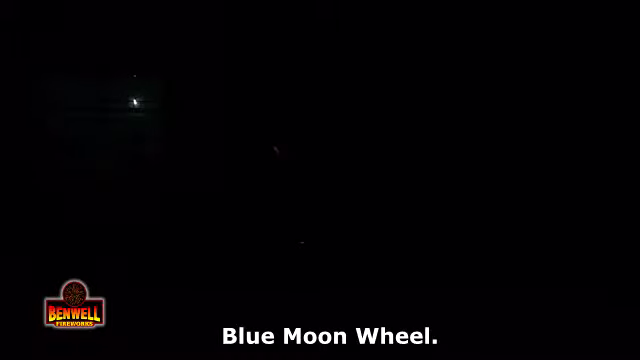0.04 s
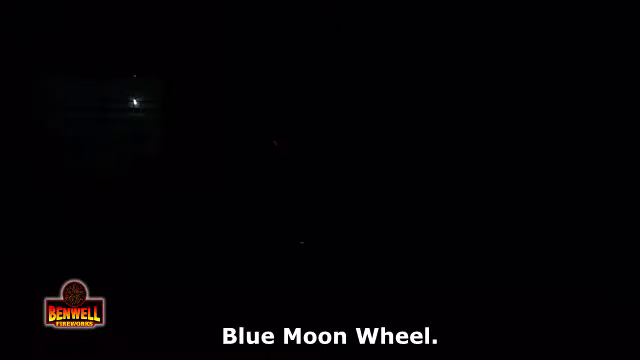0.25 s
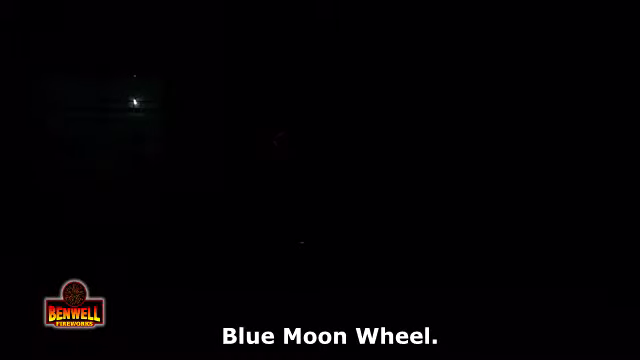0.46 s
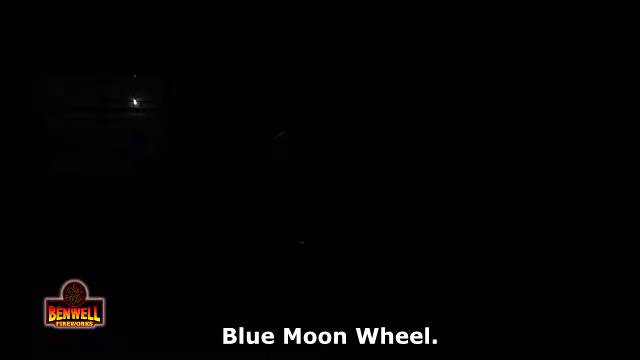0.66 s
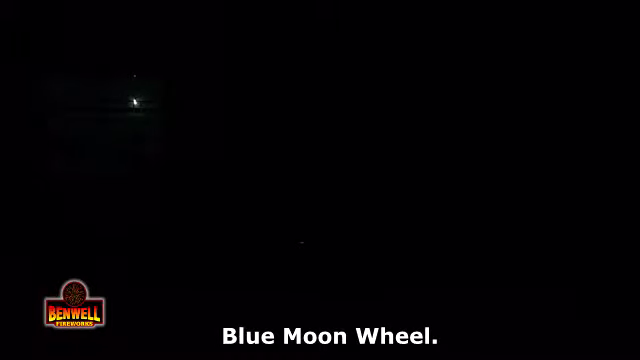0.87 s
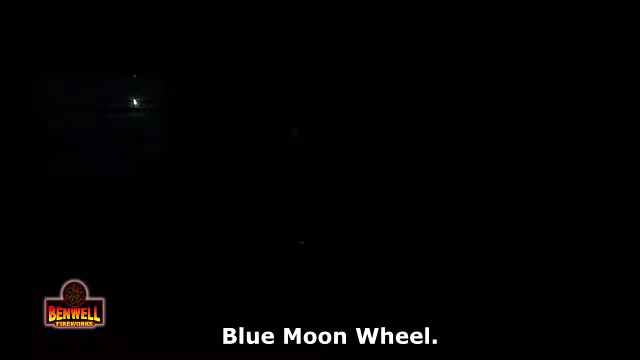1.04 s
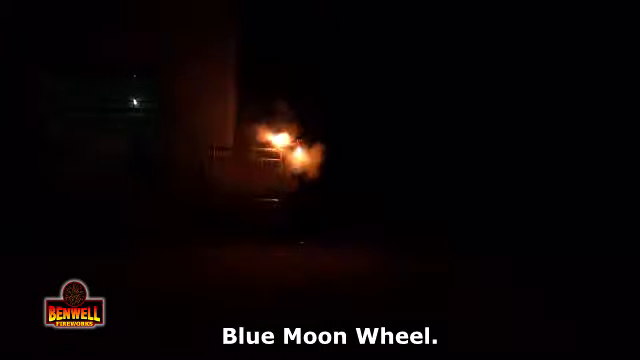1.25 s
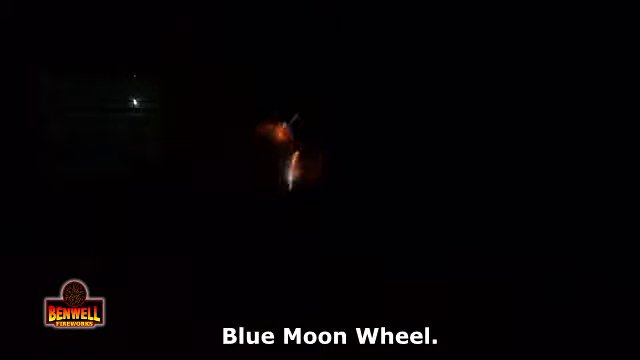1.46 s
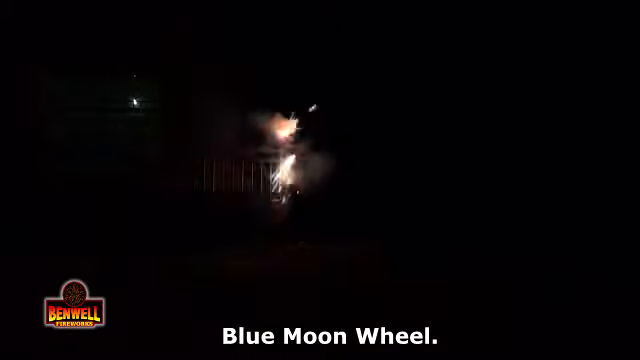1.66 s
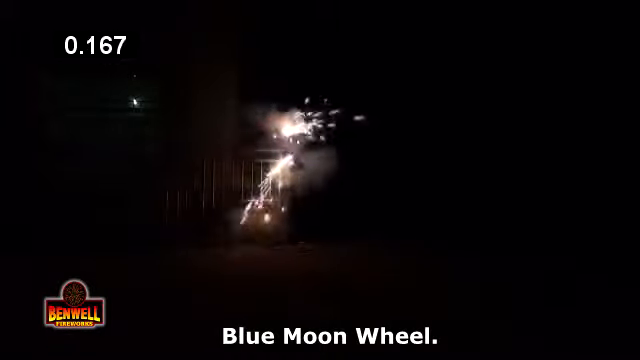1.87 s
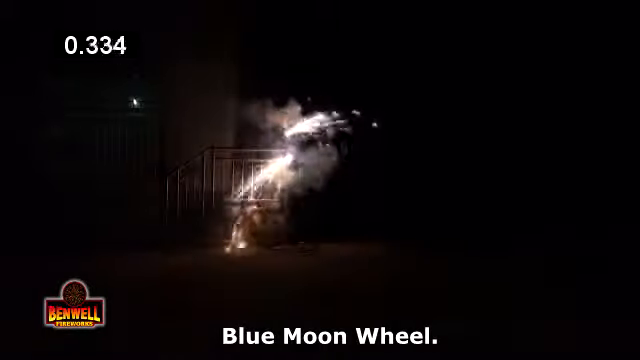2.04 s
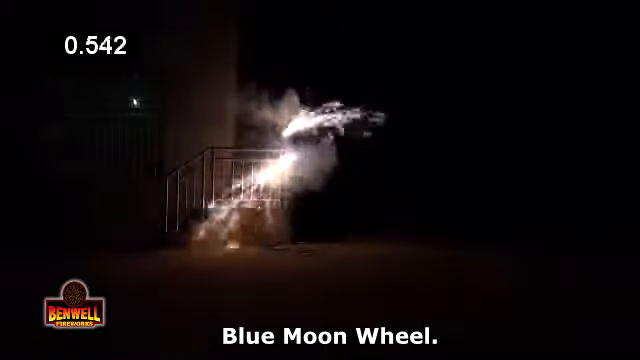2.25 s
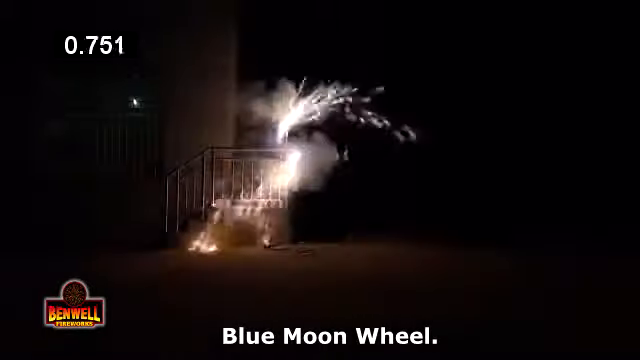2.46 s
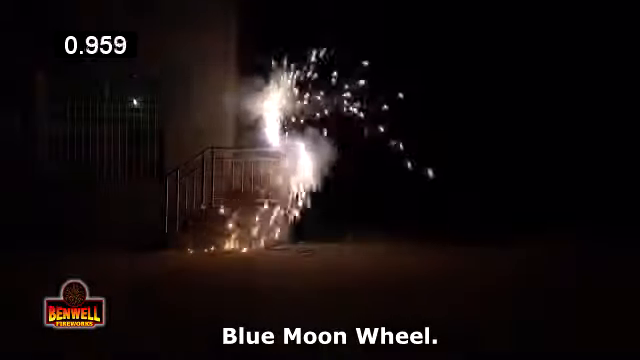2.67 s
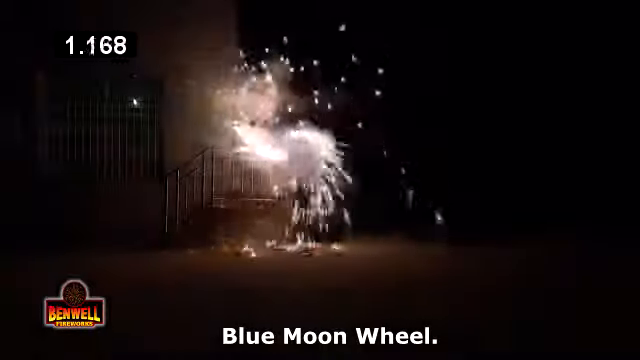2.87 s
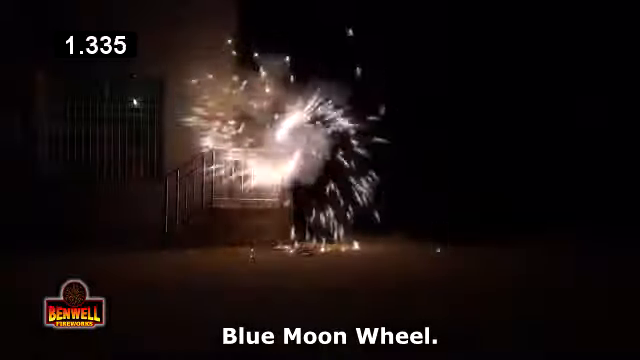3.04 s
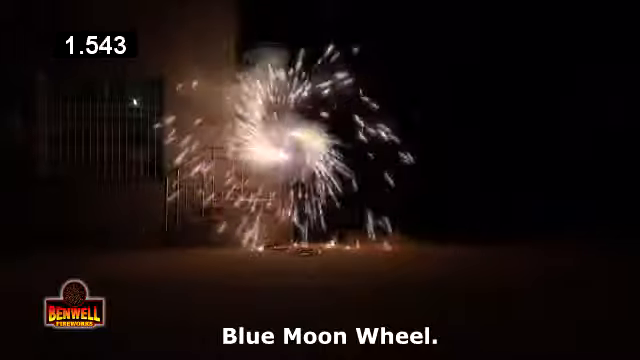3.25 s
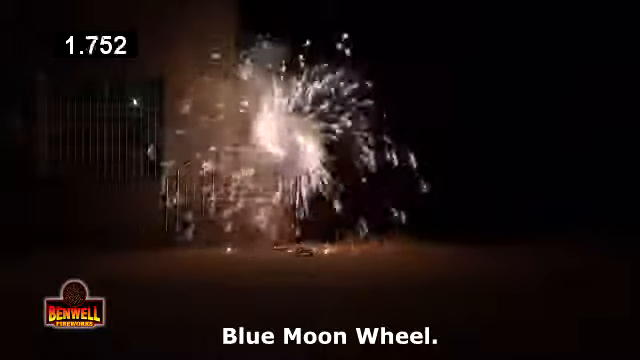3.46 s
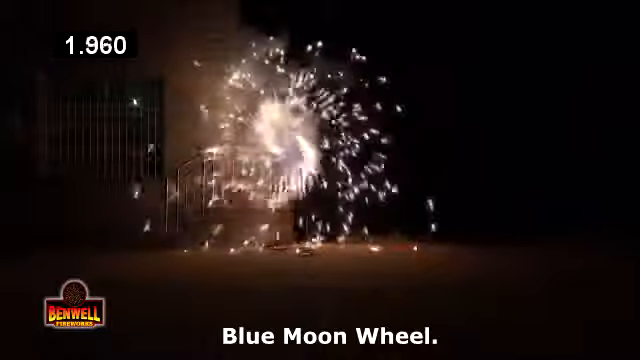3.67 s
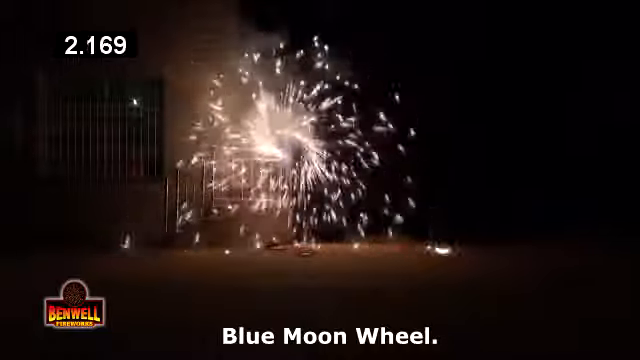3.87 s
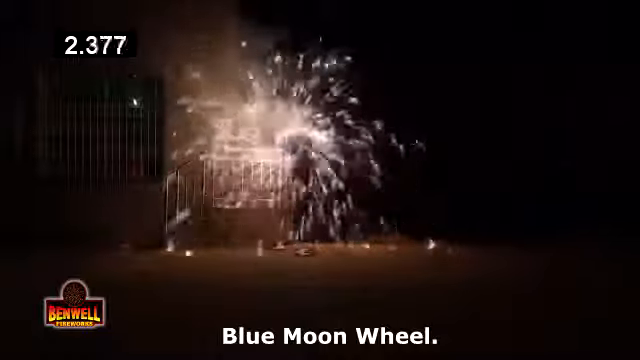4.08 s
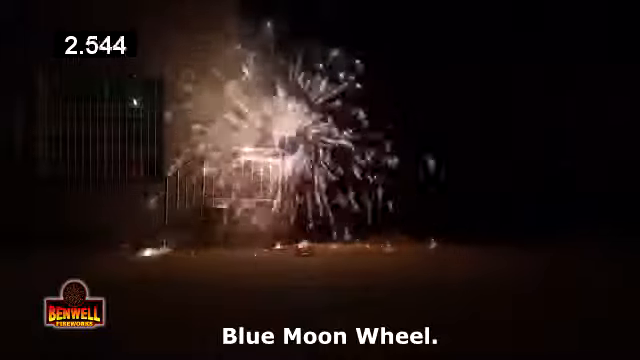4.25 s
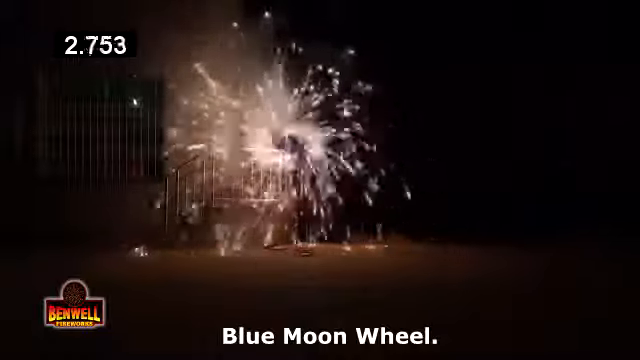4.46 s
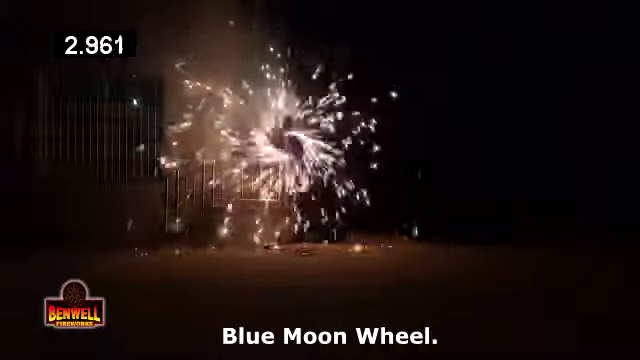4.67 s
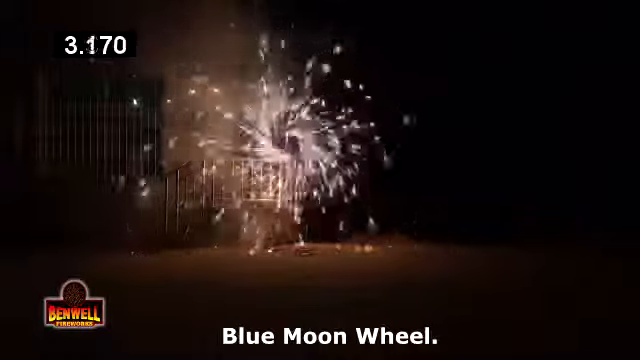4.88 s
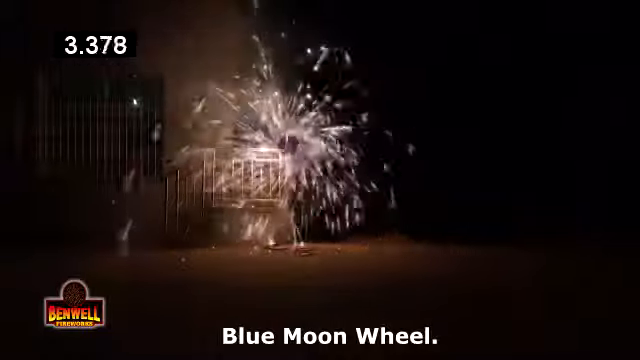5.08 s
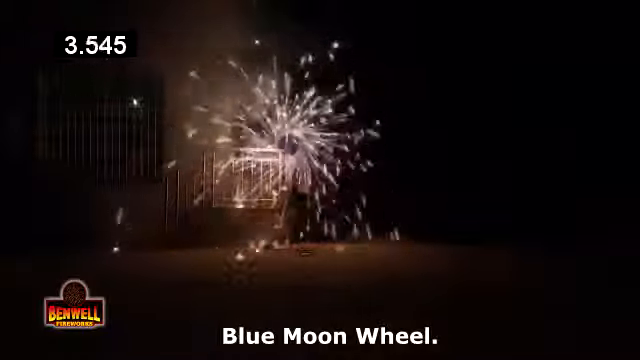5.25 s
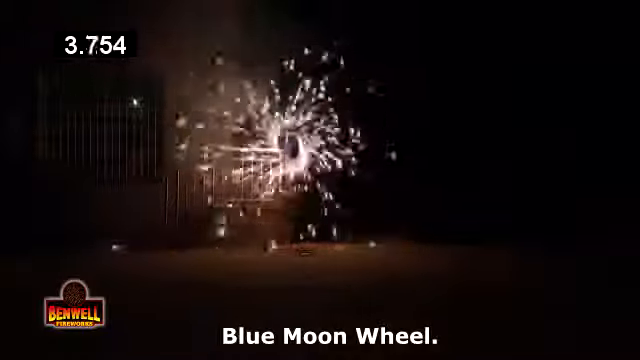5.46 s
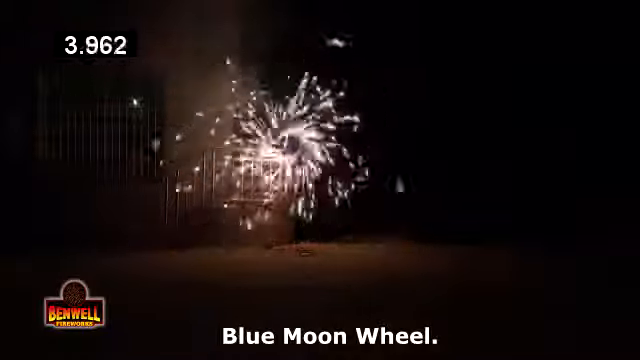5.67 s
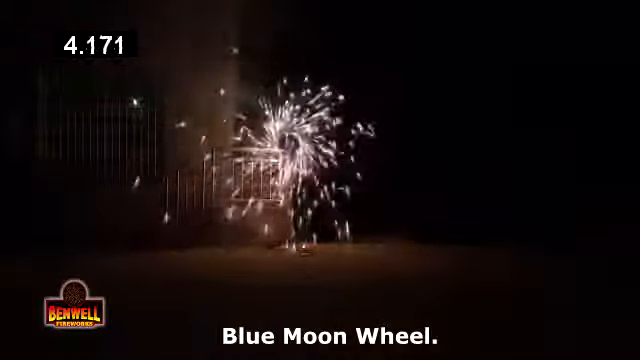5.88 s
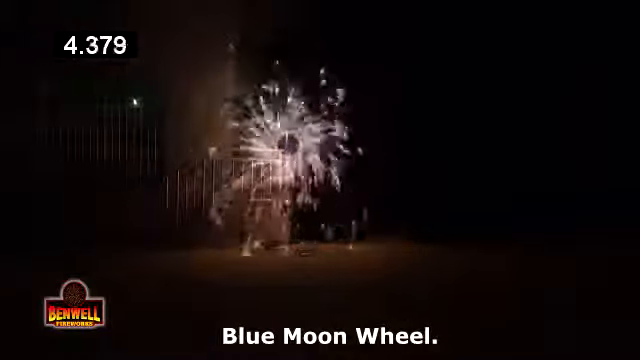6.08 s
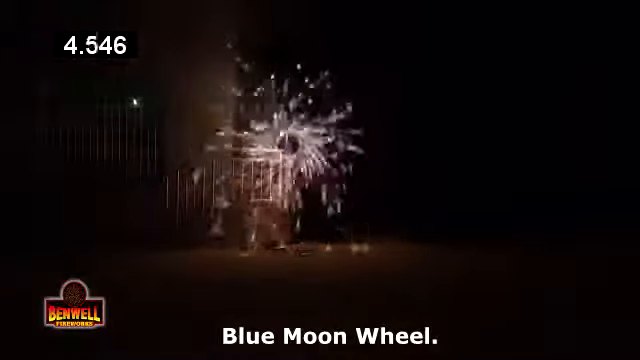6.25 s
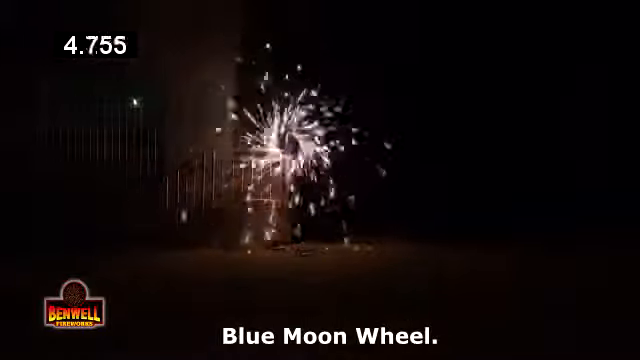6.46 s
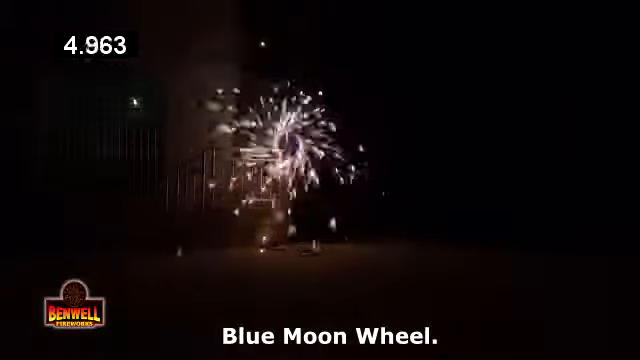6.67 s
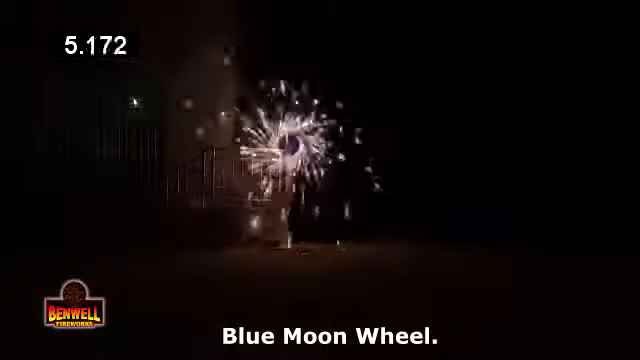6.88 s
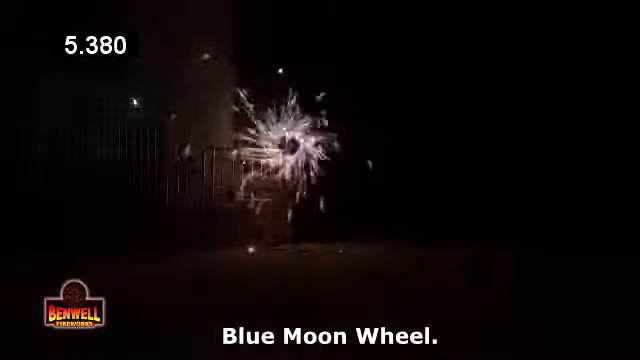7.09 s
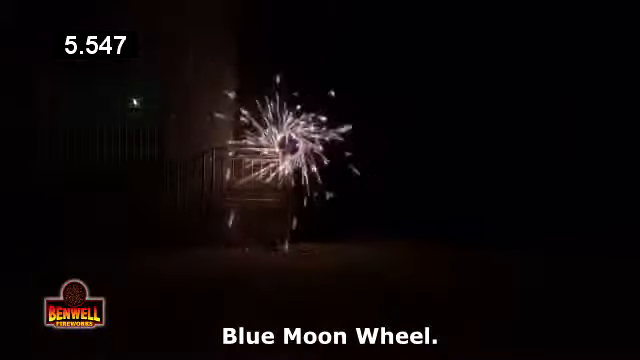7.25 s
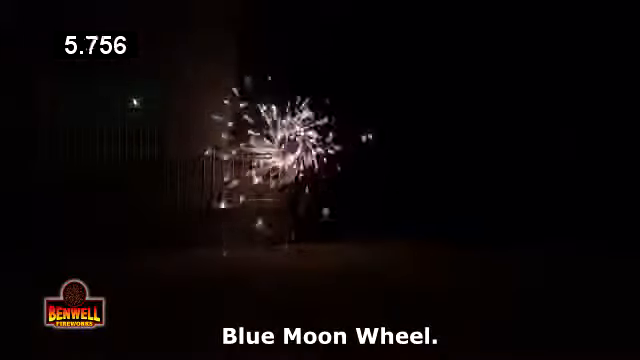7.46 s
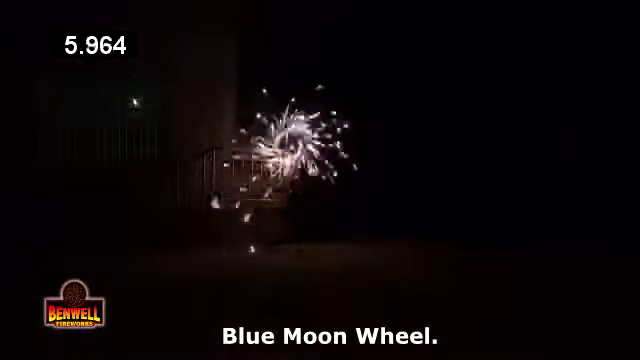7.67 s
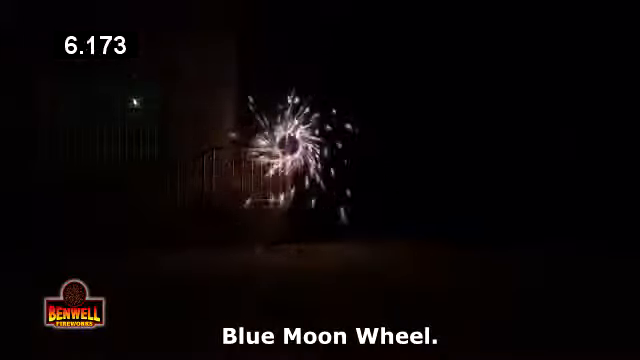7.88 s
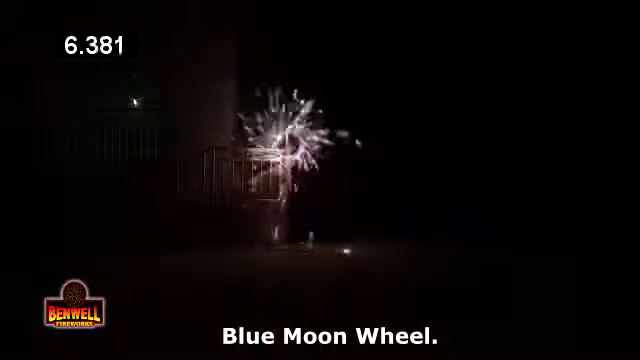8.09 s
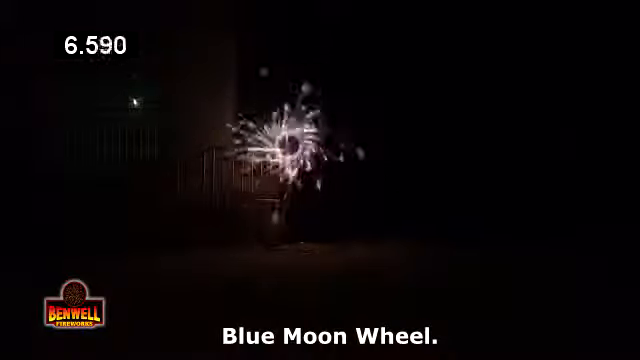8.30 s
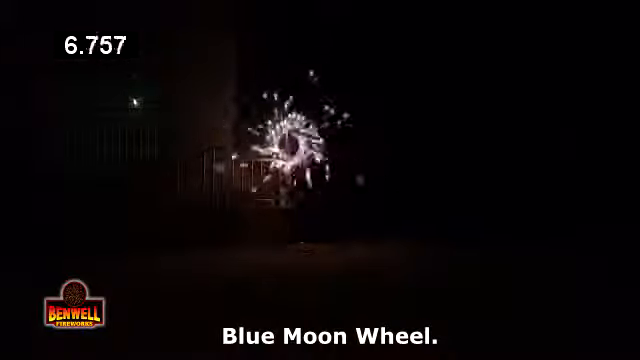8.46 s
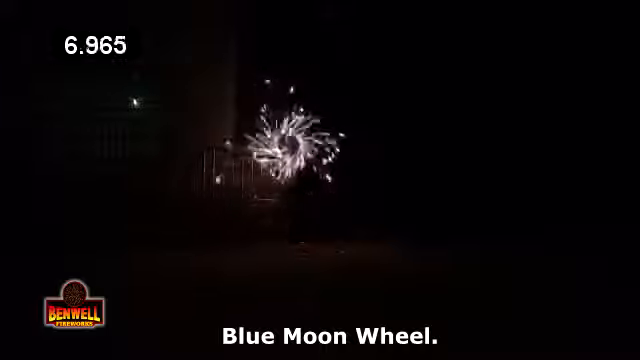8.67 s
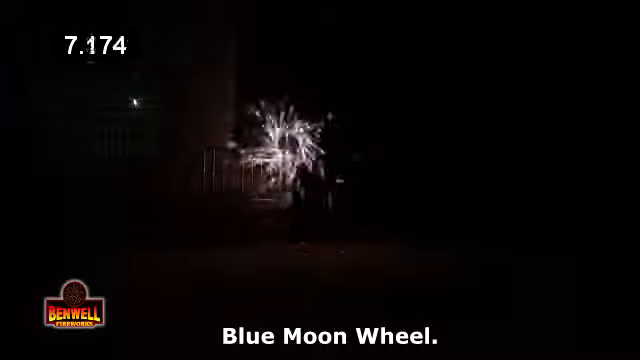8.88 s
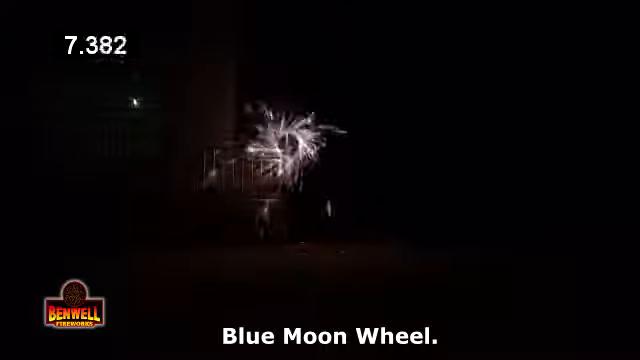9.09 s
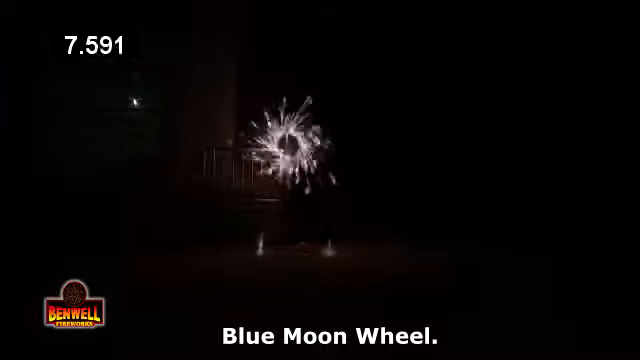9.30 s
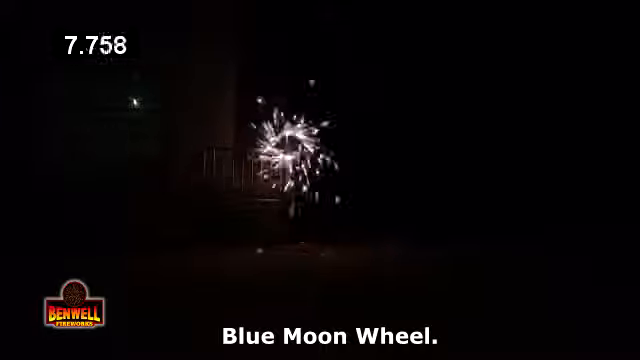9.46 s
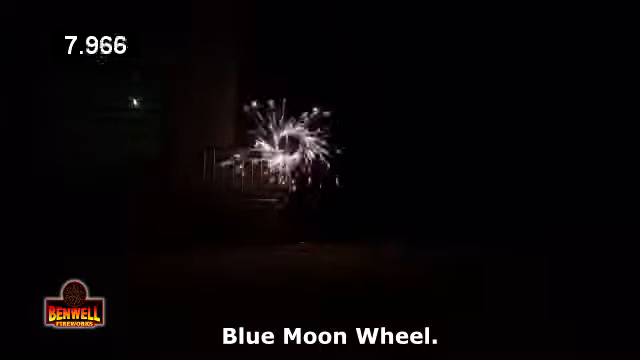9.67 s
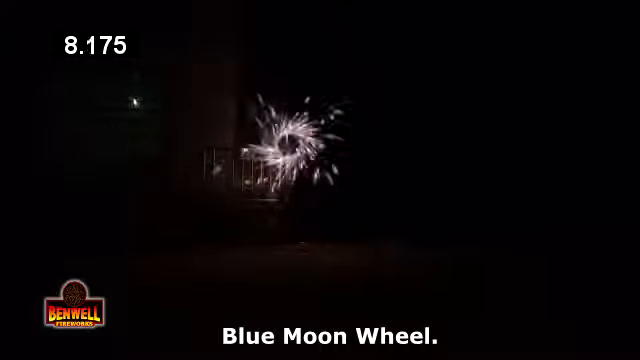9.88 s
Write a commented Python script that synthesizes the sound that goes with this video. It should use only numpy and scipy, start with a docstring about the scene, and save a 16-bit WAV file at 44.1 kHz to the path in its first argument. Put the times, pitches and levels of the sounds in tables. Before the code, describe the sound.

For the first second, a fuse hisses faintly outdoors over a low drone of distant traffic, with a few small dry rustles nearby, mostly on the right. At about 1.1 seconds, loose powder flares in a rough whoosh with two sharp spits and a few pops, fading by 1.5 seconds. The firework wheel's jets then catch, jumping in level at 1.7 and again near 1.9 seconds amid a quick string of small ticks. From 2 seconds, a loud, high rushing hiss dominates, with fine sputtering sparks and a softer hollow roar beneath; the initial low rumble soon settles. From about 3 seconds the wheel gathers speed, giving the hiss a slight swirling throb that quickens into a subtle flutter. The hollow tone shifts gently around 5 seconds, and the hiss stays loud and steady until the end, near 10 seconds.

```python
"""A firework wheel roars on a post in a yard at night, driven round by two jets of burning gas.
First the fuse hisses over distant traffic and a few small rustles. The priming (loose starter powder)
flares with spits and pops, then the jets light and the wheel speeds up. The ground echoes each jet a
moment late, and two small microphone openings (ports) colour left and right differently."""
import sys
import numpy as np
from scipy import signal
from scipy.fft import rfft, irfft, next_fast_len
from scipy.io import wavfile
from scipy.ndimage import uniform_filter1d, minimum_filter1d, map_coordinates

SR = 44100
rng = np.random.default_rng(int(sys.argv[2]) if len(sys.argv) > 2 else 0)


def pcm_store(signal):
    """Save signal as 16-bit PCM."""
    levels = np.round(np.clip(np.atleast_2d(signal), -1, 1) * 32767)
    wavfile.write(sys.argv[1], SR, levels.astype(np.int16).T)


N = 437913
ECHO_MS = 1.48  # average delay of the ground echo


def jets():
    """The jets smoulder, flare up in two steps, then burn evenly, throbbing every half turn."""
    # how far the wheel has spun (time [s], angle [turns])
    spin = [(1.5, -.03), (2.4, .04), (2.75, .25), (3.0, .5), (3.3, 1.0), (3.52, 1.5), (3.7, 2.0),
            (4.0, 3.2), (4.6, 6.5), (7.8, 26.8), (9.93, 42.0)]
    # strength of the burn (time [s], hiss [dB], roar [dB])
    burn = [(1.52, -29.5, -59), (1.6, -30.5, -49), (1.66, -33, -43), (1.71, -21.5, -42.5),
            (1.8, -24.5, -36), (1.89, -22.5, -37.5), (1.94, -16, -29.5), (2.06, -13, -28),
            (2.13, -14.5, -33.5), (2.48, -17.5, -30.5), (2.72, -16, -33.5), (2.9, -13.5, -33),
            (3.5, -12.5, -31.5), (4.2, -14.5, -34.5), (5.2, -15, -37.5), (6.2, -15, -35), (9.0, -14.5, -34),
            (9.93, -15, -32)]
    # how the ports colour the jets (pitch [Hz], left [dB], right [dB], likeness of the sides [-1..1])
    colour = [(40.5, -43.5, -48.5, 0.38), (159, -36, -32.5, 0.96), (428, -38.5, -22.5, 0.42),
              (716, -32.5, -20, -0.66), (1100, -30.5, -14, -0.62), (1810, -31.5, -10, 0.035),
              (2220, -26.5, -7, -0.17), (3030, -13.5, -11, -0.9), (3760, -25.5, -11, 0.14),
              (4090, -11, -9, 0.9), (4980, -10.5, -14, 1), (5830, -0.5, -4.5, 0.9), (8470, -5, -6, 0.98),
              (11400, -14, -14, 1.0), (15100, -15.5, -15.5, 1.0)]
    # borders of the rumble, roar, rush, hiss and top bands (pitch [Hz])
    edges = 25, 500, 1800, 4000, 10000, 17000
    t, (turns,), (hiss, roar) = np.arange(N) / SR, in_time(spin), in_time(burn)
    gas = hollow_roar(circling_gas(turns))
    second_jet_s = 1.94  # the sound is brighter until then; afterwards the rumble settles
    top = hiss - 6.5 + 7.5 * np.clip((second_jet_s - t) / 0.045, 0, 1) + 1.2 * flicker(4.3)
    rush = hiss + .3 * (roar - hiss) - 9.5 + 0.93 * flicker(5.6)
    settling = np.exp(-np.maximum(t - second_jet_s, 0) / 0.54)
    rumble = roar - 9.5 + 9.5 * settling + 1.1 * flicker(10.5)
    lit = np.clip((t - 1.42) / 0.15, 0, 1)
    throb = from_db(.5 * np.cos(4 * np.pi * turns))
    return lit * throb * flame(gas, colour, edges, (rumble, roar, rush, hiss, top), waver_db=0.78)


def circling_gas(turns):
    """Two opposite jets go round; the higher a jet is, the later and clearer its ground echo."""
    rough_ground = signal.butter(2, 10500, fs=SR, output="sos")  # returns less treble
    echo_db = -3.5 - 2 * np.clip(turns / 3, 0, 1)  # weakens as the flames spread
    out = 0
    for side in (1, -1):
        height = side * np.cos(2 * np.pi * turns)
        gas = burning(sputter_db=0.88, sparks_per_s=400, spark_db=4)
        lag_ms = ECHO_MS + .15 * height + .007 * flicker(15)  # the flame tip dances
        echo = delay(signal.sosfilt(rough_ground, gas), lag_ms)
        out = out + gas + from_db(echo_db + 3.2 * height) * echo
    return out


def hollow_roar(gas):
    """The roar rings hollow: one colour while the wheel is slow, blending into another at full speed."""
    # ringing of the slow wheel; a gain below 0 makes a dip (pitch [Hz], width [Hz], gain [factor])
    slow_tones = [(158, 37, 1), (293, 50, 2.15), (426, 93, -1.2), (556, 53, 1.64), (663, 94, -0.64),
                  (777, 50, 3), (816, 60, -0.2), (944, 58, 2.5), (2200, 27, -0.16)]
    # ringing of the fast wheel (pitch [Hz], width [Hz], gain [factor])
    fast_tones = [(159, 47, 0.65), (344, 10, 2), (592, 62, -0.7), (685, 60, 1.6), (830, 74, -1.17),
                  (918, 76, 2), (1080, 160, -0.16), (1280, 27, 0.6), (1507, 22, 1.26)]
    t, change_s, blend_s = np.arange(N) / SR, 4.9, 0.78
    fast = 1 / (1 + np.exp((change_s - t) / blend_s))
    return (gas + from_db(-2 + 2 * flicker(4)) * (1 - fast) * resonate(gas, slow_tones)
            + from_db(-0.4 + 2 * flicker(4.2)) * fast * resonate(gas, fast_tones))


def burning(sputter_db, sparks_per_s, spark_db):
    """Two rows of swirling gas noise whose push sputters, with small sparks bursting in it."""
    thrust = from_db(sputter_db * (0.47 * flicker(9.7) + flicker(50) + .5 * flicker(170)))
    sizes = from_db(spark_db + 3.8 * np.minimum(rng.exponential(1, N), 3.3)) * rng.choice([-1, 1], N)
    sparks = sizes * (rng.random(N) < sparks_per_s / SR)
    return thrust * (rng.standard_normal((2, N)) + sparks)


def flame(gas, colour, edges_hz, levels_db, waver_db):
    """Each band of a flame, low to high, follows its level and also wavers on its own."""
    spectrum, out = ports(gas, colour), 0
    for low, high, db in zip(edges_hz, edges_hz[1:], levels_db):
        out = out + from_db(db + waver_db * flicker(14.5)) * band(spectrum, low, high)
    return out


def priming():
    """The loose powder flashes off roughly, spits twice and dies as the jets take over."""
    # strength of the flare (time [s], hiss [dB], top [dB], rush [dB], rumble [dB])
    flare = [(1.11, -56, -58, -58, -38), (1.134, -25, -26, -40, -45), (1.16, -18, -26, -24, -36),
             (1.19, -24, -27, -24.5, -30), (1.222, -18, -33, -27.5, -39), (1.254, -18.5, -25, -24, -27),
             (1.354, -21, -37, -20.5, -31), (1.42, -26, -39, -25.5, -35), (1.49, -32, -46, -32.5, -45),
             (1.62, -32, -40, -39, -50)]
    # how the ports colour the flare (pitch [Hz], left [dB], right [dB], likeness [-1..1])
    colour = [(40, -35, -33, 0.35), (151, -11.5, -8.5, 0.91), (400, -14.5, -9.5, 1), (710, -11, -4, 0.7),
              (1090, -14, -6.5, 0.54), (1730, -10, -2.5, 0.69), (2300, -9, -3, 0.73), (3000, -12, -5, 0.49),
              (3500, -11, -3.5, 0.6), (4300, -5.5, -4, 1), (4870, -4, -7, 0.98), (5960, 5, 1, 0.87),
              (9000, -5.5, -5, 0.88), (13800, -15, -13, 1.0)]
    # borders of the rumble, rush, hiss and top bands (pitch [Hz])
    edges = 25, 500, 4000, 10000, 17000
    # sharp spurts of gas (time [s], length [s], hiss [dB], top [dB])
    spits = [(1.137, 0.033, -16, -12), (1.178, 0.047, -20, -21)]
    hiss, top, rush, rumble = in_time(flare)
    gas = burning(sputter_db=0.6, sparks_per_s=500, spark_db=1.5)
    t = np.arange(N) / SR
    alight = np.clip((1.66 - t) / 0.092, 0, 1) * (t > flare[0][0])
    out = alight * flame(gas, colour, edges, (rumble, rush, hiss, top), waver_db=1.2)
    spectrum = ports(gas, colour)
    hissing, sizzling = band(spectrum, 6000, 11000), band(spectrum, 9700, 16000)
    for s, length, hiss_db, top_db in spits:
        gate = np.clip((t - s) / 0.0032, 0, 1) * np.clip((s + length - t) / 0.0025, 0, 1)
        out = out + gate * (from_db(hiss_db) * hissing + from_db(top_db) * sizzling)
    return out


def pops():
    """Grains of powder burst: a bright tick and a broad thump, each with its ground echo."""
    # bursting grains (time [s], relative tick level [dB], relative thump level [dB])
    bursts = [(1.166, -15, -10), (1.216, 3, -27), (1.302, -7, -29), (1.721, -3, -34), (1.751, -6, -32),
              (1.804, -12, -30), (1.847, -10, -33), (1.897, -10, -35), (1.941, -9, -33)]
    ticks, thumps = np.zeros((2, N))
    for s, tick_db, thump_db in bursts:
        ticks[round(s * SR)] = from_db(tick_db)
        thumps[round(s * SR)] = from_db(thump_db)
    tick = 2 * bandpass(ticks + 1e-18, 4500, 11000)
    thump = 20 * bandpass(thumps + 1e-18, 120, 2500)
    return with_echo(tick + thump * from_db([[-1], [1.5]]), echo_db=-8)


def rustles():
    """Short dry crackles nearby: grainy noise that dies quickly, strongest at its own pitch."""
    # crackles (time [s], relative level [dB], pitch [Hz], time to fade by 60 dB [s])
    crackles = [(0.1685, -23, 1930, 0.097), (0.1994, -38, 5500, 0.06), (0.3441, -29, 4110, 0.06),
                (0.3586, -33, 5160, 0.06), (0.4658, -18.5, 2180, 0.06), (0.5036, -19, 2410, 0.093),
                (0.5144, -26, 2340, 0.12), (0.553, -18, 2340, 0.11), (0.5982, -24, 1860, 0.072),
                (0.7846, -26.5, 4200, 0.06)]
    out, t = np.zeros((2, N)), np.arange(SR // 5) / SR
    for s, db, hz, fade_s in crackles:
        grain = rng.standard_normal(len(t))
        grain *= from_db(2.7 * rng.standard_normal(len(t) // 40 + 1).repeat(40)[:len(t)])
        noise = grain * from_db(db - 8.5 - 60 * t / fade_s) * np.minimum(t / 0.0018, 1)
        crackle = 2 * bandpass(noise, hz / 1.06, hz * 1.05) + 0.65 * bandpass(noise, 900, 8000)
        start = round(s * SR)
        out[:, start:start + len(t)] += crackle * from_db([[-4], [2.5]])  # louder on the right
    return out


def fuse_and_night():
    """The fuse hisses, with its ground echo, above thin air noise and a low traffic drone."""
    # hiss of the fuse (time [s], level [dB])
    fuse_levels = [(0.0, -42), (0.268, -43), (0.456, -40), (1.1, -40)]
    # air stirring with the rustles (time [s], level [dB])
    air_levels = [(0.0, -55.5), (0.2, -46), (0.33, -51.5), (0.42, -49.5), (0.59, -43), (0.73, -50),
                  (1.1, -55)]
    # the recorder's gain drops under the loud jets, so the traffic drone sounds quieter
    # (time [s], gain [dB])
    gain_duck = [(1.1, -0.5), (3.0, -0.5), (5.0, -5.5), (9.93, -7)]
    # how the ports colour all three (pitch [Hz], left [dB], right [dB], likeness [-1..1])
    colour = [(39.6, -20, -1, 0.39), (129, 3.5, 5.5, 0.94), (336, 8, 10.5, 0.98), (483, -4, 2, 0.86),
              (676, -13, -7, 0.53), (1500, -17, -7, 0.75), (2960, -19, -11.5, 0.58),
              (4860, -16.5, -19.5, 1), (6100, -4.5, -8.5, 0.78), (9050, -8.5, -9, 0.99),
              (13800, -11, -10.5, 1)]
    (air_db,), (fuse_db,), (duck_db,) = in_time(air_levels), in_time(fuse_levels), in_time(gain_duck)
    spectrum = ports(rng.standard_normal((2, N)), colour)
    traffic = from_db(-43.5 + duck_db + 1.1 * flicker(25)) * band(spectrum, 25, 910)
    air = from_db(air_db) * band(spectrum, 590, 4800)
    fuse = from_db(fuse_db + flicker(11)) * band(spectrum, 3900, 16000)
    return with_echo(fuse, echo_db=-15) + air + traffic


def ports(source, colour):
    """Left and right spectrum at the ports: both get the first row of sound, only the left the second."""
    size = next_fast_len(N)
    hz, *columns = np.transpose(colour)
    log_hz = np.log(np.fft.rfftfreq(size, 1 / SR) + 1)
    left_db, right_db, alike = [np.interp(log_hz, np.log(hz), c) for c in columns]
    shared, own = rfft(source, size)
    alike = np.clip(alike, -1, 1)
    left = alike * shared + np.sqrt(1 - alike ** 2) * own
    return np.array([from_db(left_db) * left, from_db(right_db) * shared])


def band(spectrum, low_hz, high_hz):
    """One soft-edged slice of a spectrum as sound; the average of left and right has strength 1."""
    size = next_fast_len(N)
    hz = np.fft.rfftfreq(size, 1 / SR) + 1
    share = 1 / (1 + (hz / high_hz) ** 6) - 1 / (1 + (hz / low_hz) ** 6)
    out = irfft(spectrum * share, size)[:, :N]
    return out / np.sqrt(np.mean(out.mean(axis=0) ** 2))


def bandpass(x, low_hz, high_hz):
    """Gently turns down everything outside two pitches."""
    return signal.sosfilt(signal.butter(1, [low_hz, high_hz], "band", fs=SR, output="sos"), x)


def resonate(x, tones):
    """Lets a sound ring at several pitches and adds the results."""
    out = 0
    for hz, width_hz, gain in tones:
        r = np.exp(-np.pi * width_hz / SR)
        feedback = [1, -2 * r * np.cos(2 * np.pi * hz / SR), r * r]
        out = out + gain * signal.lfilter([(1 - r * r) / 2, 0, (r * r - 1) / 2], feedback, x)
    return out


def with_echo(x, echo_db):
    """A sound plus its bounce off the ground."""
    return x + from_db(echo_db) * np.roll(x, round(ECHO_MS * SR / 1000), axis=1)


def delay(x, ms):
    """A sound heard ms later; ms may change sample by sample."""
    at = np.arange(N) - ms * SR / 1000
    return np.array([map_coordinates(row, [at], order=3, mode="nearest") for row in x])


def flicker(rate_hz):
    """A smooth random wobble of typical size 1, drawn at every 20th sample."""
    r = np.exp(-40 * np.pi * rate_hz / SR)
    slow = signal.lfilter([1], [1, -2 * r, r * r], rng.standard_normal(N // 20 + 4002))[4000:]
    slow -= uniform_filter1d(slow, size=SR // 60)  # drop the slowest wander
    slow /= np.sqrt(np.mean(slow ** 2) + 1e-20)
    return np.interp(np.arange(N) / 20, np.arange(len(slow)), slow)


def in_time(rows):
    """Joins a table's points with straight lines: one curve for each column after the time."""
    s, *columns = np.transpose(rows)
    return [np.interp(np.arange(N) / SR, s, c) for c in columns]


def from_db(db):
    """Turns decibels into a factor to multiply by."""
    return 10 ** (np.asarray(db) / 20)


def scene():
    """All the sources together, left and right."""
    return fuse_and_night() + rustles() + priming() + pops() + jets()


def record(dry):
    """A quick limiter turns down the loudest peaks, then the highest treble is cut."""
    limit, cutoff_hz = .9, 14070
    gain = minimum_filter1d(np.minimum(1, limit / (np.abs(dry).max(axis=0) + 1e-9)), size=441)
    held = dry * uniform_filter1d(gain, size=441)
    return signal.sosfilt(signal.ellip(14, .3, 75, cutoff_hz, fs=SR, output="sos"), held)


dry = scene()
out = record(dry)
pcm_store(out)
```